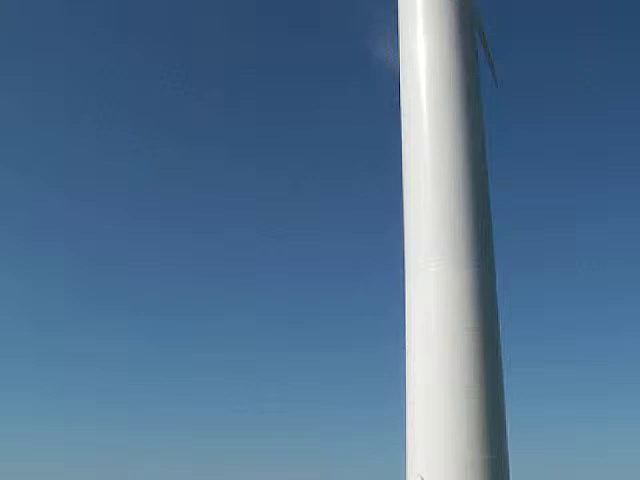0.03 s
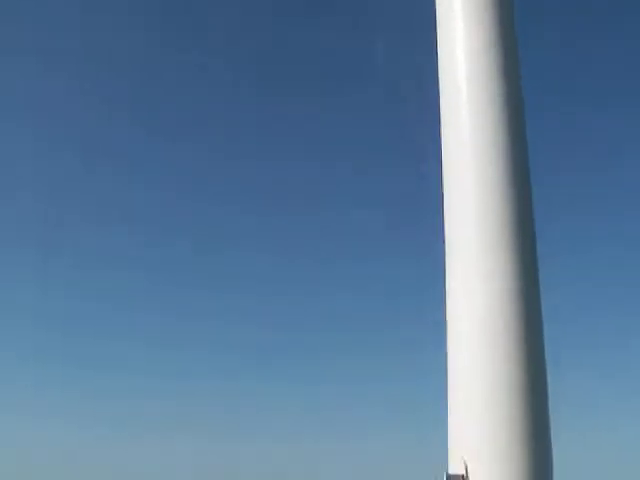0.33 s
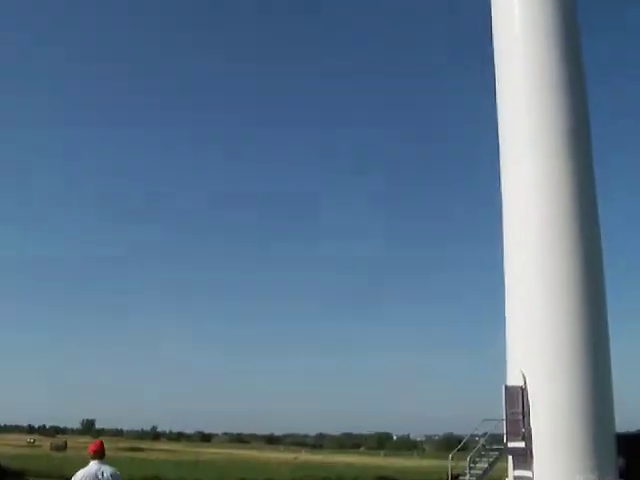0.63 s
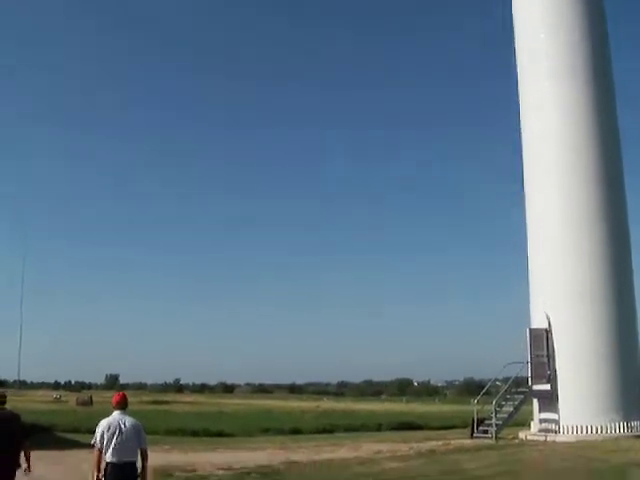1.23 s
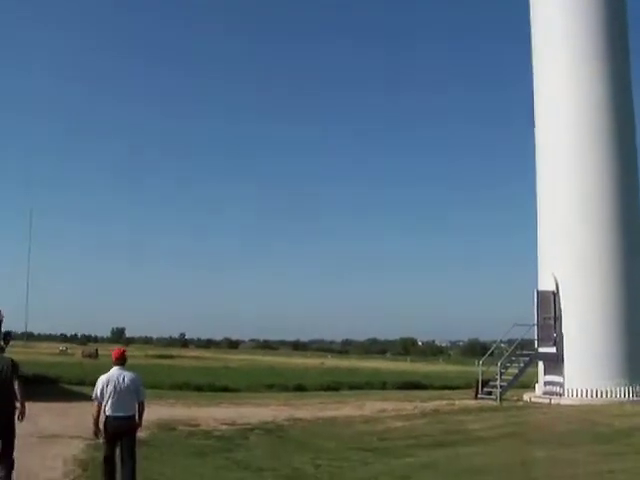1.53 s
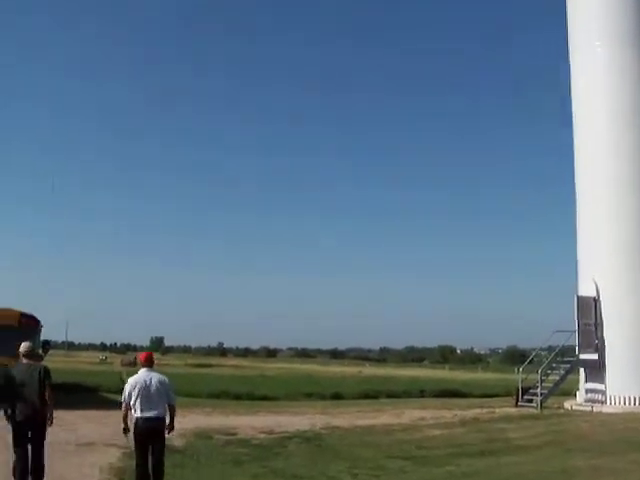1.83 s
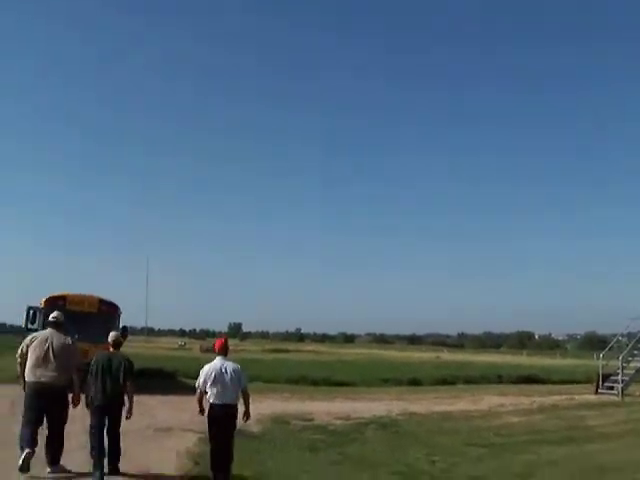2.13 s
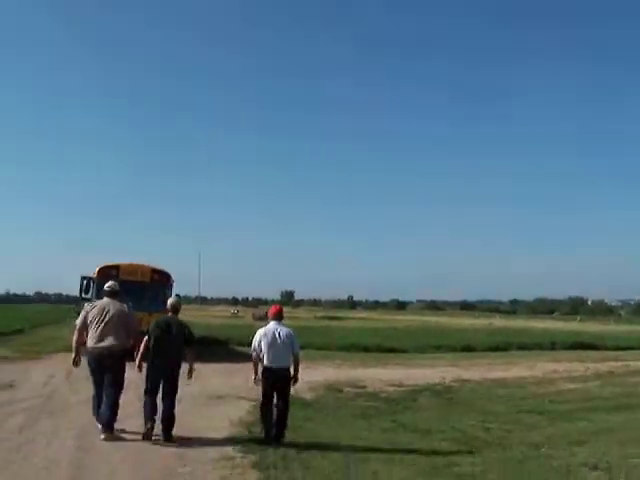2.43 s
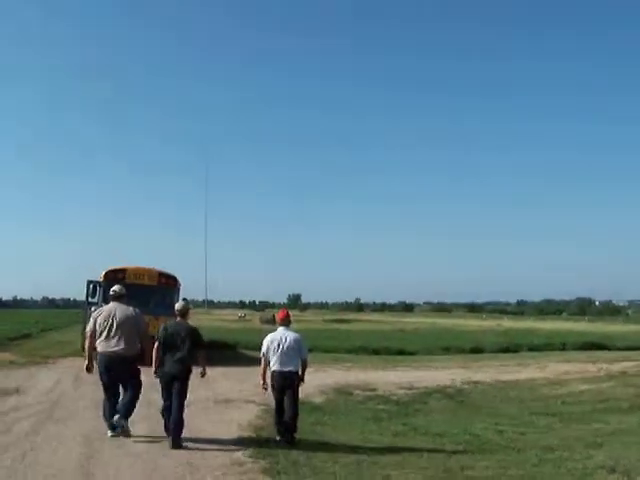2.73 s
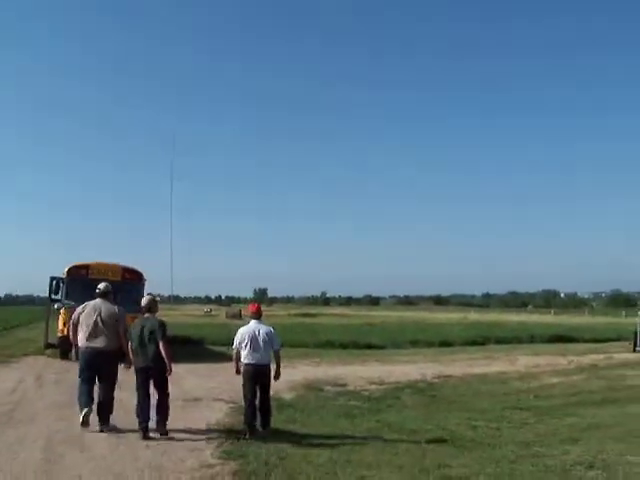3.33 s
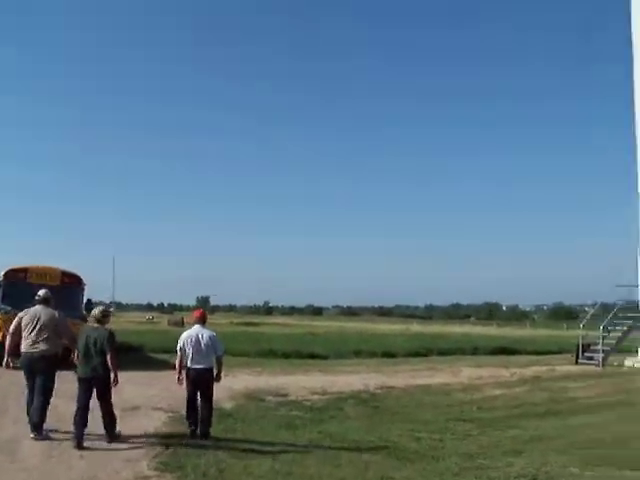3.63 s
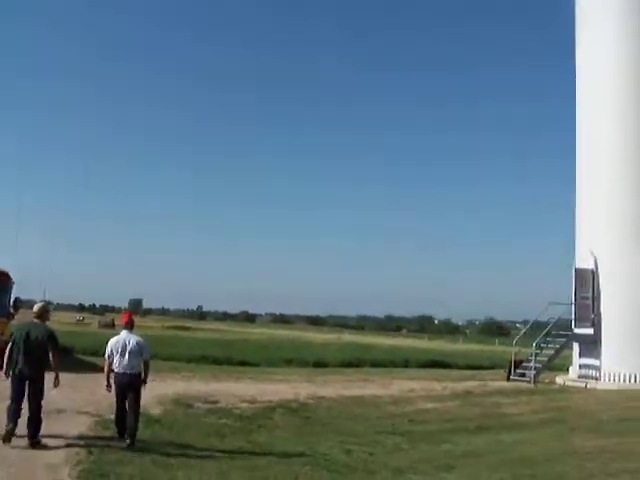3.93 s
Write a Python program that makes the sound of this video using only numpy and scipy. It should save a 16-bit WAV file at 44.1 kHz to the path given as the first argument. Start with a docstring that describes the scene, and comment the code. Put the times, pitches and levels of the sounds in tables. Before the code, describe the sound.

Wind buffets the microphone in uneven, rumbling gusts, with a soft high swish behind.

```python
"""Wind on the microphone under a turbine

Open fields under a wind turbine, with gusts blowing right on the two ports of a small camera microphone.
Eddies rumble at each port on their own; a stronger gust is louder and brighter and overloads the input
into a rough crackle. Behind them a soft, high swish swells and fades, coloured by each port's resonance."""
import sys
import numpy as np
from scipy import signal
from scipy.fft import rfft, irfft
from scipy.io import wavfile

SR = 44100
rng = np.random.default_rng(int(sys.argv[2]) if len(sys.argv) > 2 else 0)


def put_to_file(sound):
    """Save the sound as 16-bit audio at rate SR, in the file named by the first command-line argument."""
    columns = np.atleast_2d(sound).T  # one column per channel
    safe = np.clip(columns, -1, 1)
    whole_steps = np.round(safe * 32767)
    wavfile.write(sys.argv[1], SR, whole_steps.astype(np.int16))


N = 176400
TIME = np.arange(N) / SR

# Wind strength right at each port: time_s, strength_db
GUSTS_LEFT = [(0.381, 13), (.44, -6), (0.592, 2), (0.641, -9.5), (.68, 7.5), (0.861, 0.5), (1.05, 5),
              (1.15, 7.5), (1.3, -.5), (1.54, -5), (1.591, -14), (1.66, -2.5), (1.9, -11.5), (1.979, -1.5),
              (2.091, 1.5), (2.14, -9.5), (2.22, -9), (2.36, 1), (2.721, -8), (3.049, 8), (3.139, -3),
              (3.23, 12), (3.33, 9), (3.44, 7), (3.53, -16), (3.64, -4.5), (3.73, -4), (3.809, 4.5),
              (3.99, -6)]
GUSTS_RIGHT = [(.38, 6), (.61, 6), (.66, 6), (.76, 14), (.94, 9.5), (1.18, 10), (1.229, 1.5), (1.298, 12),
               (1.5, 5.5), (1.585, -9), (1.76, 0), (1.959, 3), (2.119, 3), (2.23, -0.5), (2.45, 7),
               (2.99, 2.5), (3.039, 12.5), (3.119, 7), (3.35, 9), (3.389, -3.5), (3.438, 8.5),
               (3.479, -0.5), (3.59, -8), (3.73, -1.5), (3.8, -8), (3.86, 1), (3.99, 2.5)]
# Single eddies slapping one port: peak_s, port (0 left, 1 right), boost_db, fall_width_s
EDDY_SLAPS = [(0.371, 0, 24, 0.0018), (0.371, 1, 20, 0.0018), (0.44, 1, 2, 0.011), (0.469, 0, 10.5, 0.014),
              (0.601, 0, 10, 0.015), (0.625, 1, 11, 0.0077), (0.786, 1, 8.5, 0.0044),
              (0.808, 1, 1.5, 0.0033), (0.854, 1, 13, 0.0047), (1.016, 1, 7, 0.0089), (1.175, 1, 10, 0.015),
              (1.284, 1, 10, 0.0044), (1.482, 1, -0.5, 0.0044), (1.642, 0, 6, 0.0091),
              (1.769, 1, 7.5, 0.0064), (1.848, 1, 9, 0.0039), (2.039, 1, 7, .010), (2.082, 0, 12, 0.011),
              (2.107, 1, 13, 0.0062), (2.172, 0, 15.5, 0.012), (2.296, 1, 6, 0.016), (2.479, 1, 11.5, .008),
              (2.513, 0, 3.5, 0.0076), (2.658, 1, 4, 0.021), (2.819, 1, 8, 0.018), (3.014, 0, 8, 0.018),
              (3.032, 1, 12, 0.012), (3.21, 0, 11, 0.0068), (3.297, 0, 3.5, 0.0084),
              (3.411, 0, 11.5, 0.004), (3.428, 1, 14, 0.012), (3.81, 0, 7, 0.0083), (3.89, 0, 9.5, 0.0081)]
def wind_strength(port, gusts):
    """Wind at one port in dB: gusts, random flutter and slaps that rise faster than they fall."""
    flutter_db, rise_share = 2.0, 0.48
    wind_db = in_time(gusts) + flutter_db * drift(rate_hz=19.9)
    for peak_s, slapped_port, boost_db, fall_width_s in EDDY_SLAPS:
        if slapped_port == port:
            width_s = np.where(TIME < peak_s, rise_share, 1) * fall_width_s
            wind_db += boost_db * bell_curve(peak_s, width_s)
    return wind_db


# Eddy pressure spectrum on each port in a wind of 0 dB: pitch_hz, relative_density_db
EDDIES_LEFT = [(20, 3.5), (50, -3.5), (110, -2.5), (220, -6), (330, -9.5), (560, -16), (900, -28.5),
               (1800, -46), (3600, -60.5)]
EDDIES_RIGHT = [(20, 1), (55, 2), (100, 3), (220, -6.5), (450, -17), (900, -30.5), (1800, -51),
                (3600, -61.5)]
# Small eddies grow faster with the wind than large ones: pitch_hz, growth_db_per_wind_db
EDDY_GROWTH = [(30, 0.7871), (120, 0.81), (400, 1.1525), (1000, 1.53), (3000, 1.5)]
def buffeting(wind_db, spectrum, level_db):
    """Eddies on one port, in half-octave sizes: all follow the wind, the small ones most and in bursts."""
    burst_spread_db, bursts_above_hz = 8, 557
    bursts_db = burst_spread_db * drift(rate_hz=125)
    edges_hz = 16 * 2 ** np.arange(0, 8.6, .5)
    rumble, power = 0, 0
    for low_hz, high_hz in zip(edges_hz, edges_hz[1:]):
        centre_hz = np.sqrt(low_hz * high_hz)
        bandpass = signal.butter(3, [low_hz, high_hz], "band", fs=SR, output="sos")
        band = unit_rms(signal.sosfilt(bandpass, rng.standard_normal(N)))
        gain = from_db(at_hz(spectrum, centre_hz)) * np.sqrt(high_hz - low_hz)
        smallness = centre_hz / (centre_hz + bursts_above_hz)
        surge_db = at_hz(EDDY_GROWTH, centre_hz) * wind_db + smallness * bursts_db
        rumble += gain * band * from_db(surge_db)
        power += gain ** 2
    return from_db(level_db) * rumble / np.sqrt(power)


# The swish in the background, behind the wind: time_s, level_db
SWISH_LEVEL = [(.38, -37.5), (.65, -35.5), (1.05, -34.5), (1.33, -40), (1.6, -39), (1.75, -38.5),
               (2.0, -39.5), (2.17, -36.5), (2.5, -38.5), (2.78, -42.5), (3.15, -40), (3.6, -37.5),
               (3.8, -38), (4.0, -40.5)]
# The swish heard through each port's resonance: pitch_hz, relative_density_db
SWISH_LEFT = [(300, -12.5), (1800, -19), (3000, -9.5), (4400, -3), (5700, 3), (6500, -1), (7300, -11),
              (8300, -19.5)]
SWISH_RIGHT = [(300, -13), (1800, -12.5), (3000, -5.5), (4300, -3.5), (5000, 5.5), (5800, -9), (7300, -7.5),
               (8300, -16.5)]
# Swoops, where the swish reaches lower at both ports: peak_s, width_s, level_db
SWOOPS = [(1.729, 0.071, -41), (2.249, 0.26, -39.5)]
# Colour of the swoops: pitch_hz, relative_density_db
SWOOP_SPECTRUM = [(1500, -25.5), (2800, -1), (4000, 4.5), (5200, 2), (7000, -22.5)]
def swish(spectrum, side_db):
    """Soft background hiss that swells, flickers and fades, joined midway by two swells of lower hiss."""
    flicker_db = 0.9
    level_db = in_time(SWISH_LEVEL) + side_db + flicker_db * drift(rate_hz=11)
    hiss = from_db(level_db) * coloured_noise(spectrum)
    swoop_gain = sum(from_db(db) * bell_curve(peak_s, width_s) for peak_s, width_s, db in SWOOPS)
    return hiss + swoop_gain * coloured_noise(SWOOP_SPECTRUM)


def from_db(db):
    """Decibels to gain."""
    return 10 ** (np.asarray(db) / 20)


def unit_rms(x):
    """Scale to an rms of 1."""
    return x / np.sqrt(np.mean(x ** 2) + 1e-20)


def bell_curve(peak_s, width_s):
    """A Gaussian swell of height 1."""
    return np.exp(-.5 * ((TIME - peak_s) / width_s) ** 2)


def in_time(points):
    """Read (time_s, value) points at every sample."""
    return np.interp(TIME, *np.transpose(points))


def at_hz(points, hz):
    """Read (pitch_hz, value) points on a log-frequency axis."""
    pitch_hz, value = np.transpose(points)
    return np.interp(np.log(np.maximum(hz, 1)), np.log(pitch_hz), value)


def drift(rate_hz):
    """Smooth random motion of spread 1."""
    hop, settle_steps = 40, 2000
    pole = np.exp(-2 * np.pi * rate_hz * hop / SR)
    noise = rng.standard_normal(N // hop + settle_steps + 2)
    slow = signal.lfilter([1], [1, -2 * pole, pole * pole], noise)[settle_steps:]
    return np.interp(np.arange(N) / hop, np.arange(len(slow)), unit_rms(slow))


def coloured_noise(spectrum):
    """Steady noise of the given spectrum, rms 1."""
    hz = np.arange(N // 2 + 1) * SR / N
    shaped = rfft(rng.standard_normal(N)) * from_db(at_hz(spectrum, hz))
    return unit_rms(irfft(shaped, N))


def scene():
    """Wind right on the left and right ports, with the swish behind it."""
    left = buffeting(wind_strength(0, GUSTS_LEFT), EDDIES_LEFT, level_db=-9.5)
    left += swish(SWISH_LEFT, side_db=1)
    right = buffeting(wind_strength(1, GUSTS_RIGHT), EDDIES_RIGHT, level_db=-7.0)
    right += swish(SWISH_RIGHT, side_db=-1)
    return np.array([left, right])


def record(dry):
    """The camera's input opens abruptly, flattens the gust peaks and cuts the deepest bass and the top."""
    start_s, fade_out_s = .372, .004
    ceiling, hardness = 0.94, 8.5
    coupling_hz, cutoff_hz = 2.6, 8300
    gated = dry * (TIME >= start_s) * np.minimum((TIME[-1] - TIME) / fade_out_s, 1)
    overloaded = gated / (1 + np.abs(gated / ceiling) ** hardness) ** (1 / hardness)
    coupled = signal.sosfilt(signal.butter(1, coupling_hz, "high", fs=SR, output="sos"), overloaded)
    return signal.sosfiltfilt(signal.butter(20, cutoff_hz, fs=SR, output="sos"), coupled)


dry = scene()
out = record(dry)
put_to_file(out)
```